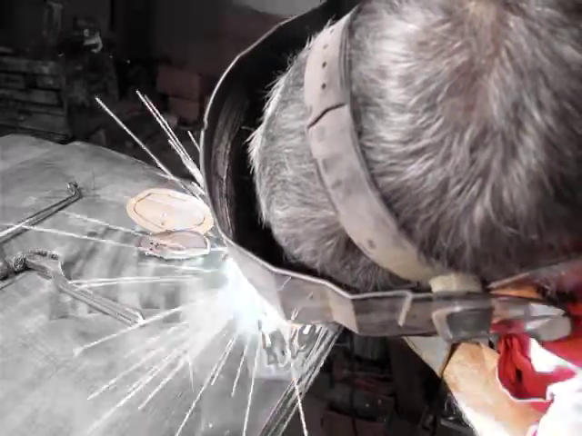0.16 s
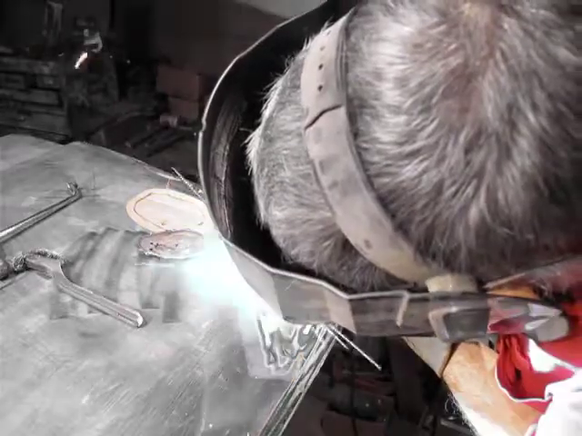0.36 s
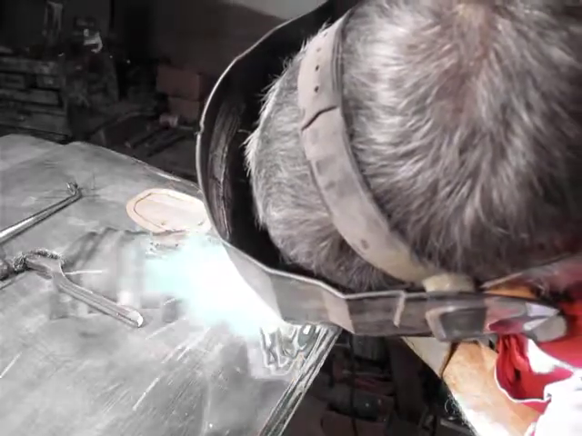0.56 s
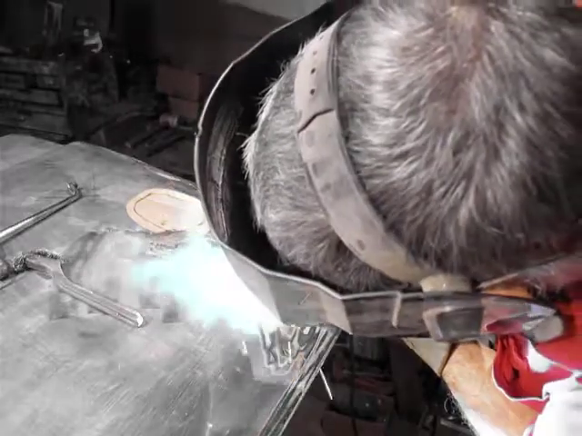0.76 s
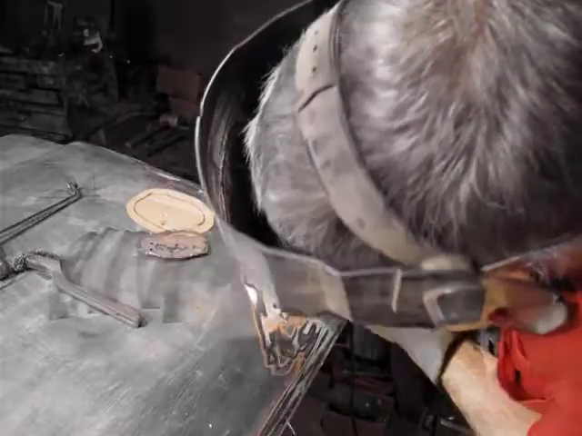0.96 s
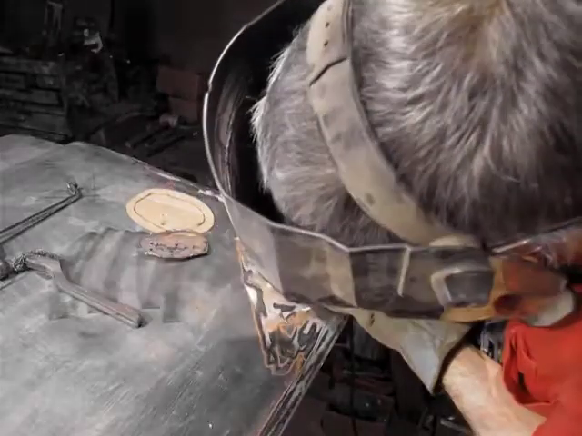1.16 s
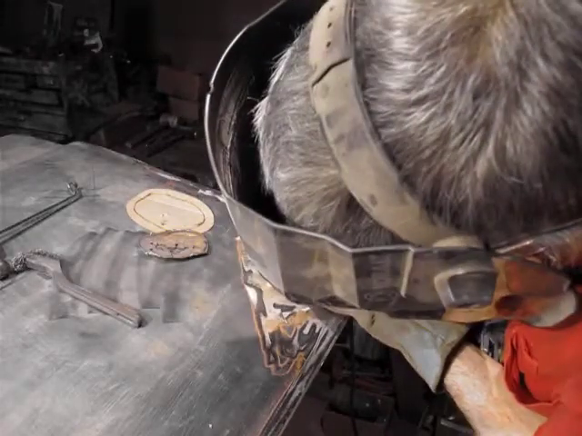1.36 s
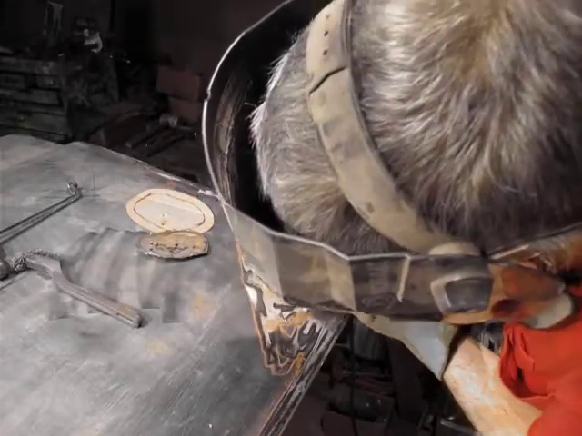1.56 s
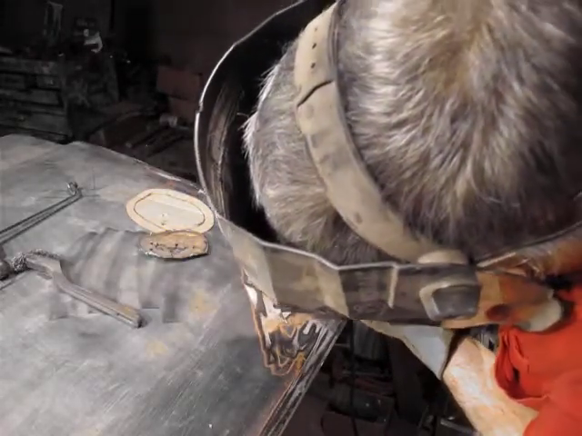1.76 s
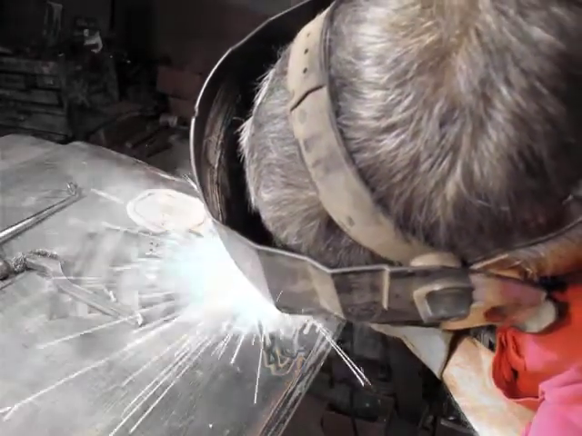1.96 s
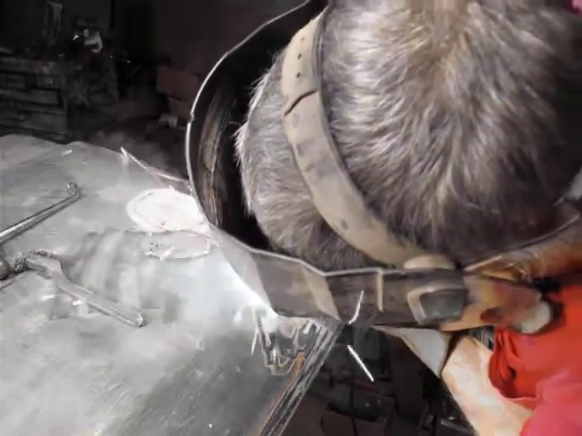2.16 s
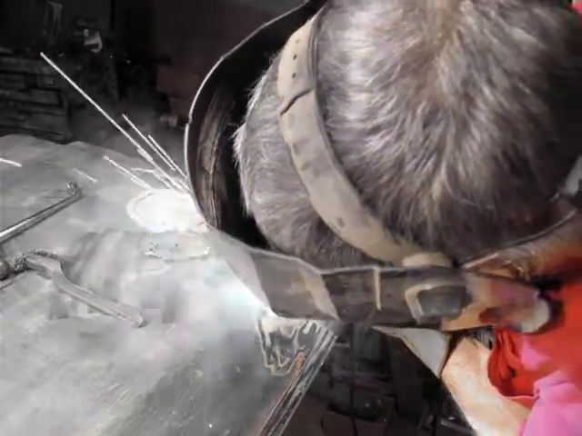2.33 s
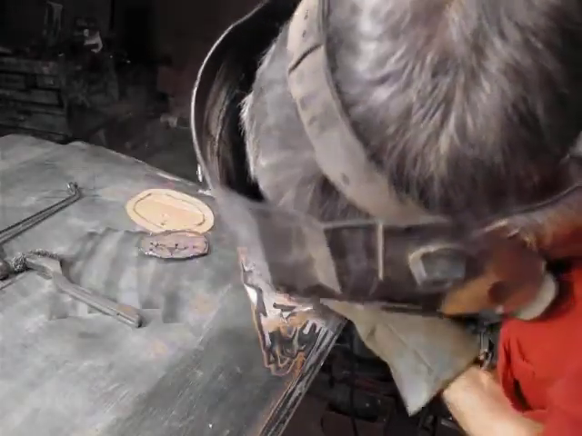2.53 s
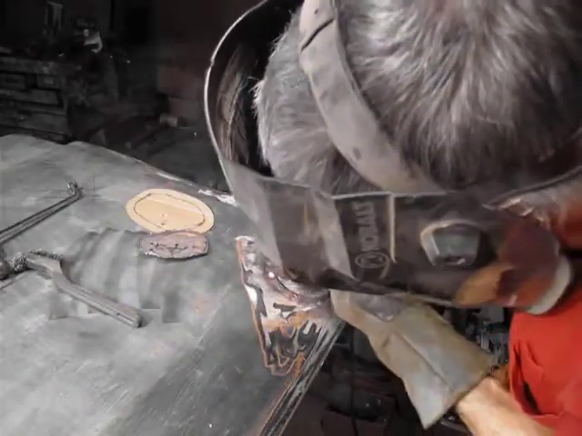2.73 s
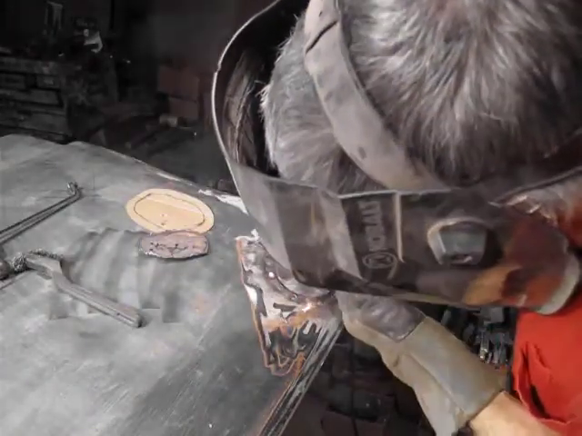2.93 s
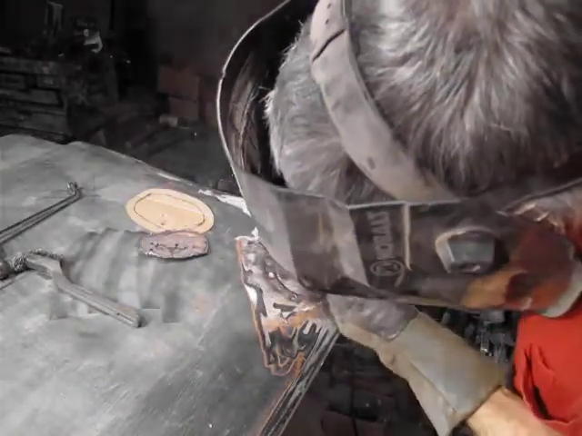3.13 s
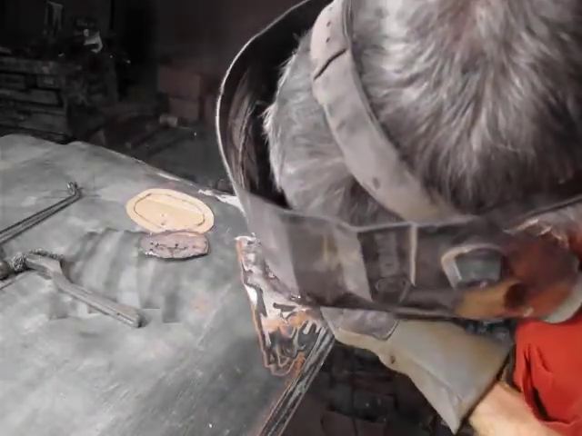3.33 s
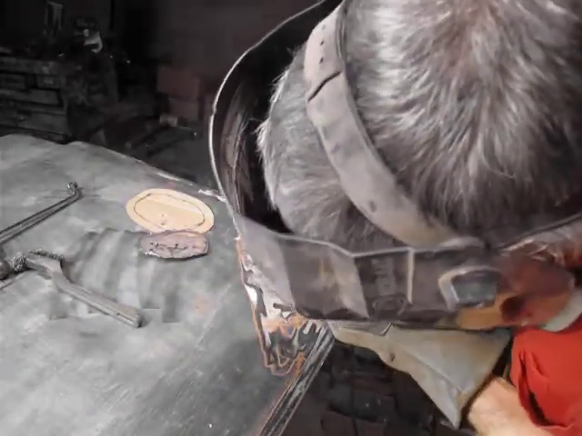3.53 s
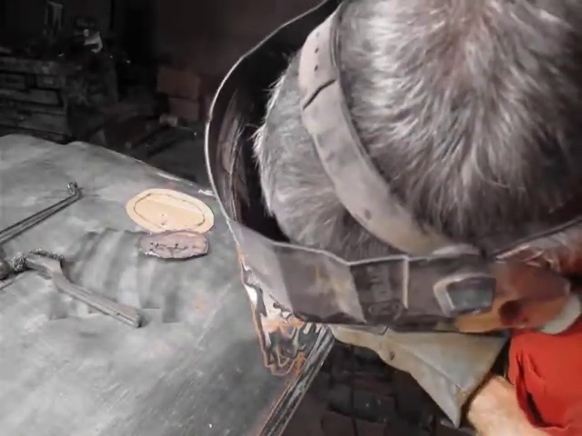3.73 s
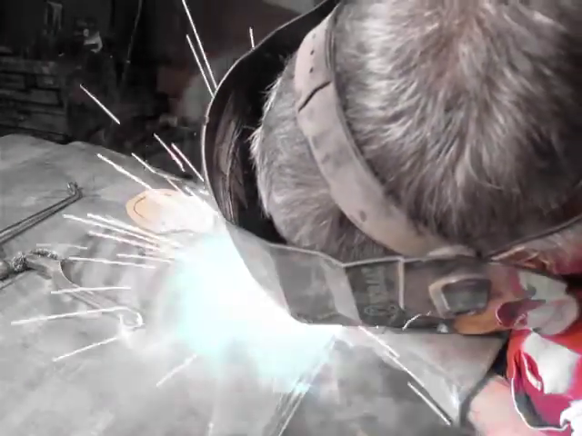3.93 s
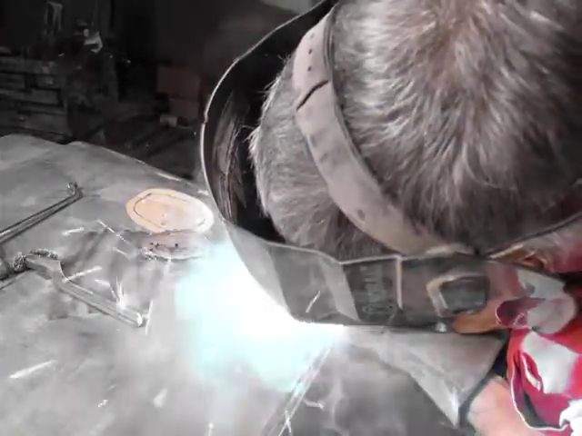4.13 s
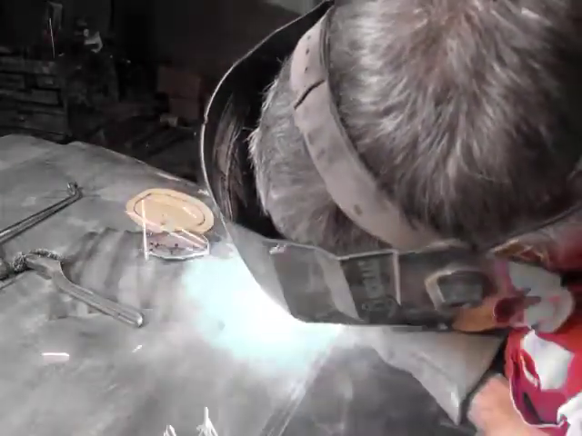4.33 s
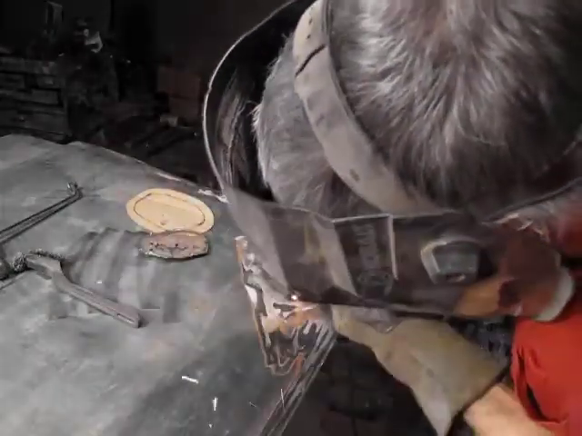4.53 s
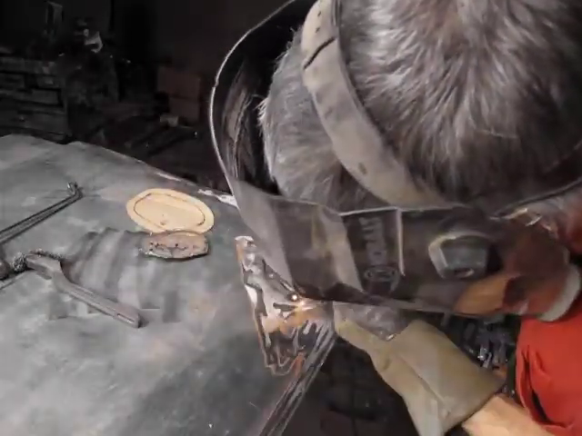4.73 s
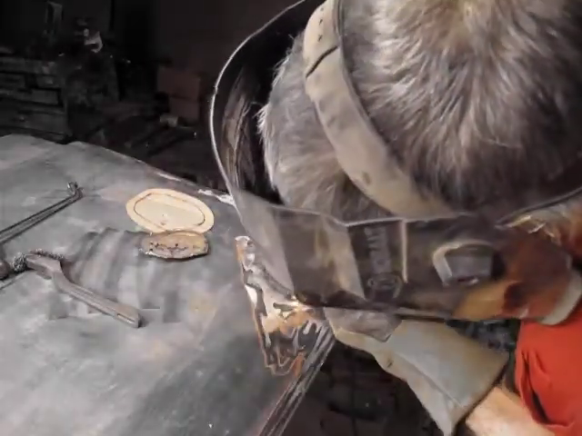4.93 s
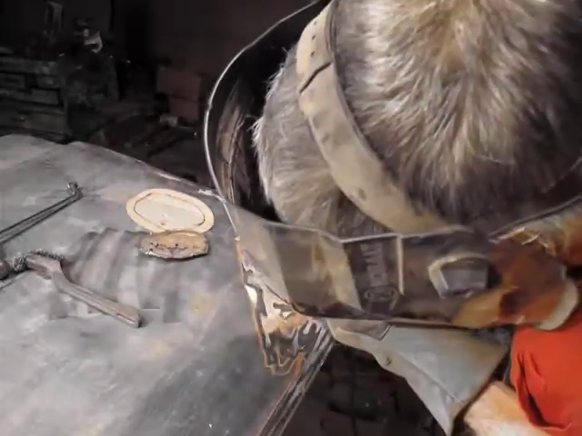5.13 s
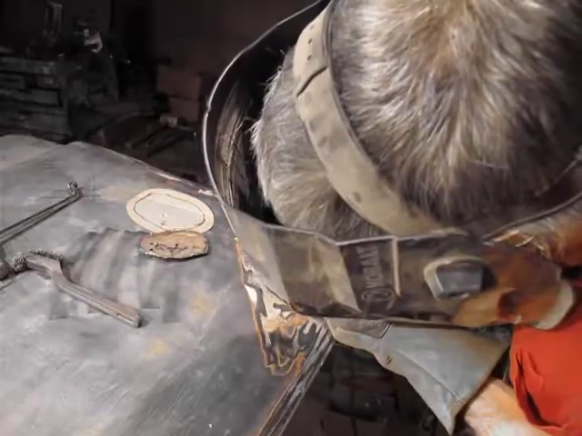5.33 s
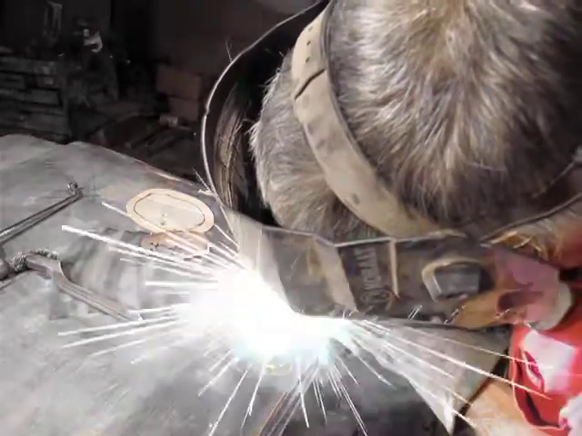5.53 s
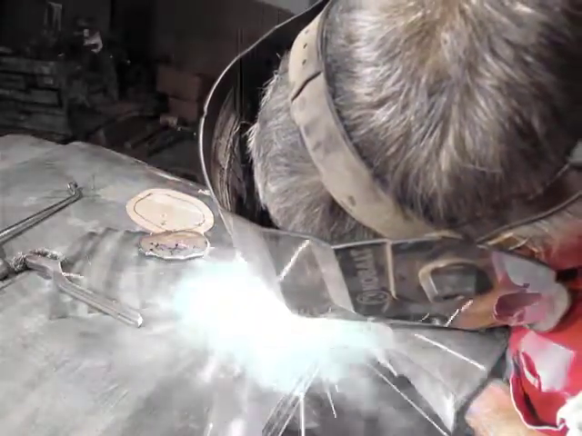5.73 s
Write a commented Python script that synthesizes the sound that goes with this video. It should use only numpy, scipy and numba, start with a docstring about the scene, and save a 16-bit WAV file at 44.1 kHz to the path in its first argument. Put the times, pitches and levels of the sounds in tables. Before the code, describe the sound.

Four short bursts of welding crackle, pop and sizzle on thin sheet steel, over the steady low hum of a workshop fan.

```python
"""Four MIG tack welds on thin rusty sheet steel, a step from a small camera. Two cooling fans hum throughout.
At each trigger pull a valve ticks, shielding gas puffs out and wire rasps through the torch. The wire strikes
with a bang, then shorts and bursts in a run of pops while the arc fizzes. Near surfaces and the workshop echo
every pop, the sheet rings and the camera's gain control ducks the hum. Then the arc dies, the gas bleeds away
and the hum is heard alone."""
import sys
import numpy as np
from scipy import signal
from scipy.fft import rfft, irfft
from scipy.io import wavfile
from scipy.ndimage import uniform_filter1d
from numba import njit

SR = 44100
rng = np.random.default_rng(int(sys.argv[2]) if len(sys.argv) > 2 else 0)


def dump_mix(stems):
    """Bounce the given channels to the path in sys.argv[1] as a 16-bit WAV at rate SR."""
    frames = np.atleast_2d(stems).T  # one column per channel
    limited = np.clip(frames, -1, 1)  # hard clip at full scale
    pcm = np.round(limited * 32767).astype(np.int16)
    wavfile.write(sys.argv[1], SR, pcm)


N = 259308
T = np.arange(N) / SR

# Levels are relative: each source adds its own gain, and spectra give only a shape. blade tones of two fans:
# f/Hz, level/dB
BLADE_TONES = [(212.9, -36), (195.8, -50.5), (642, -50.5)]
# resonances of the fan housing: f/Hz, bandwidth/Hz, level/dB
HOUSING_MODES = [(117, 2.6, -67), (206, 57, -51.5), (356.5, 2.8, -58), (441.6, 20, -55.5), (530, 50, -56),
                 (630.4, 6.8, -55.5), (736, 19, -57), (815, 31, -51), (989, 39, -56.5), (1055, 25, -51.5),
                 (1138, 35, -60.5), (1200, 16, -54), (1834, 31, -60), (2794, 140, -61.5)]
# spectra of the fan's air, the valve tick, the gas spurt and the steady jet: f/Hz, level/dB
AIR_SPECTRUM = [(25, -1), (90, -9), (150, -3), (230, 8), (280, 0.5), (420, 6), (700, 3), (1200, 6.5),
                (1700, 2.5), (2200, -3), (2900, -4.5), (3800, -8.5), (7000, -10), (10000, -10.5),
                (12500, -26), (16000, -30)]
VALVE_SPECTRUM = [(200, -25), (3000, -9), (6000, -10), (9000, 0), (11000, 0), (15500, -4)]
SPURT_SPECTRUM = [(200, -42), (1400, -69), (2700, -21), (4000, -17), (6000, -26), (7200, -5), (7800, -17),
                  (9000, 0), (10500, 6), (11400, -10), (12400, 0), (15500, -19.5)]
JET_SPECTRUM = [(200, -7.5), (1400, -1.5), (2300, -5), (3600, -5), (5500, -7.5), (7000, 0.5), (7800, -3.5),
                (9000, 5.5), (10200, 4), (11200, -15), (12600, -29), (15500, -29)]
# gas flow at each trigger pull: on t/s, off t/s, level/dB
GAS_FLOWS = [(0.11, 0.835, -28.5), (1.8192, 2.385, -30.5), (3.787, 4.39, -28), (5.4547, 6.002, -28.5)]
# reflections from near surfaces: delay t/s, level/dB
ECHO_PATHS = [(.00475, -2.5), (.0138, -13), (.0151, -16)]
# modes of the thin sheet: f/Hz, level/dB, 60 dB decay t/s
SHEET_MODES = [(1055, -73, .4), (1300, -71, .3), (2030, -75, .3)]
# the arc burns: start t/s, end t/s, fizz level/dB
ARC_BURNS = [(.135, .2, -27), (.28, .335, -22), (.335, .53, -10.5), (.53, .765, -11.5), (1.935, 2.07, -10),
             (2.07, 2.3, -6.5), (3.90, 4.12, -11), (4.12, 4.25, -12.5), (4.29, 4.33, -21),
             (5.515, 5.56, -16), (5.56, 5.64, -23), (5.64, 5.95, -12)]
# runs of light dips of wire into the pool: first t/s, last t/s, rate/Hz, timing spread/cycles, level/dB
WIRE_DIPS = [(.145, .25, 300, .3, -25), (.484, .521, 55, .1, -1), (1.9576, 2.075, 120, .18, 0),
             (2.081, 2.179, 145, .16, 1.5), (2.2059, 2.2937, 115, .15, 1), (5.535, 5.635, 300, .3, -24)]
# a large drop bursts and throws spatter: t/s, level/dB
DROP_BURSTS = [(.335, -4), (.354, 1), (.361, 6), (.3761, 3), (.3968, 10), (.414, 12), (.4395, 10),
               (.4578, 10), (.4717, 8), (.4792, 4), (.513, 10), (.5561, 4), (.5713, 10), (.5878, 9),
               (.6041, 3), (.6212, 12), (.6382, 6), (.6563, 7), (.6915, 3), (.7099, 1), (.7222, 5),
               (.7371, 7), (.7507, 9), (1.8738, -13), (1.9495, 5), (1.9717, 4), (2.0096, 4), (2.0222, 5),
               (2.088, 5), (2.1905, 7), (2.2161, 10), (2.252, 7), (2.2716, 8), (2.2874, 10), (3.9082, 0),
               (3.922, 11), (3.9386, 4), (3.9546, 8), (3.9814, 4), (3.9895, 9.5), (4.0063, 4), (4.0186, 6),
               (4.0316, 9), (4.0456, 2), (4.0606, 8), (4.0745, 8), (4.0897, 12), (4.1055, 7.5), (4.1215, 7),
               (4.1434, 7), (4.1597, 6), (4.1769, 9), (4.1943, 7), (4.2109, 6), (4.2286, 11), (5.5771, -5),
               (5.6411, -4), (5.673, 7), (5.6869, 5), (5.7017, -1), (5.7178, 3), (5.7309, 2), (5.7361, 12),
               (5.7541, 6), (5.7723, 11), (5.7916, 3), (5.8106, 4), (5.8334, 9), (5.8525, 10)]
# the wire strikes and blows apart: t/s, level/dB, decay t/s, thump level/dB, thump upper f/Hz
WIRE_STRIKES = [(0.1312, -6, .0005, -8, 120), (0.2700, -2, .001, -10, 170), (0.3383, 10, .001, -4, 130),
                (1.8808, 3, .0005, -11, 280), (1.9322, 7, .0004, -9, 260), (3.8615, 8, .0012, -4, 550),
                (4.2872, 3, .0005, -11, 350), (5.5092, 10, .0012, -5, 1100), (5.6575, 9, .0008, -8, 750)]
# spectra of the echoes, the fizz, the pops and the bangs: f/Hz, level/dB
ECHO_SPECTRUM = [(60, -20), (1000, -14), (1900, -9), (2400, -13), (3000, -5), (3700, -7), (5000, -2),
                 (6800, -6), (7800, -7), (8500, 2), (10400, 6.5), (11300, 1), (12400, -7), (14400, -3),
                 (15500, -11)]
FIZZ_SPECTRUM = [(100, -30), (400, -23), (1200, -13), (2000, -10.5), (3300, -13), (4300, -11.5),
                 (5000, -6.5), (6100, -5.5), (6900, -2.5), (7850, -11), (8800, 0), (9500, 3.5), (10500, 4),
                 (11200, -2), (12600, -12.5), (15500, -19)]
POP_SPECTRUM = [(60, -30), (200, -18), (500, -12), (1500, -10.5), (2000, -6.5), (3100, -7), (4300, -12.5),
                (5200, -10), (6400, -5), (6950, 1.5), (7750, -11), (9200, 0), (10400, 2), (11300, -6),
                (12600, -9), (13300, -16), (15500, -17)]
BANG_SPECTRUM = [(60, -26), (200, -18), (500, -13), (1250, -8.5), (2100, -11), (3300, -8), (4200, -11),
                 (6000, -5), (6900, 2.5), (7800, -9), (9000, -2), (10300, 2.5), (11300, -5), (12600, -10),
                 (15500, -20)]


def undb(db):
    """Amplitude ratio of a level: tenfold for every 20 dB."""
    return 10 ** (np.asarray(db) / 20)


def unit(x):
    """Normalisation to an rms of 1."""
    return x / np.sqrt(np.mean(x ** 2))


def ring(x, response):
    """Convolution: the output of a linear system with this impulse response."""
    return signal.fftconvolve(x, response)[:N]


def colour(spectrum, size=4096):
    """Minimum-phase response of unit energy, found by folding the cepstrum of a spectral outline."""
    hz, db = np.transpose(spectrum)
    f = np.maximum(np.fft.rfftfreq(size, 1 / SR), 1)
    magnitude = undb(np.interp(np.log(f), np.log(hz), db))
    cepstrum = irfft(np.log(magnitude))
    cepstrum[1:size // 2] *= 2
    cepstrum[size // 2 + 1:] = 0
    response = irfft(np.exp(rfft(cepstrum)))
    return response / np.linalg.norm(response)


def hiss(spectrum):
    """White noise filtered to a spectral outline, rms 1."""
    return unit(ring(rng.standard_normal(N), colour(spectrum)))


def resonance(hz, width_hz):
    """Noise under a Lorentzian resonance curve, rms 1."""
    f = np.fft.rfftfreq(N, 1 / SR)
    return unit(irfft(rfft(rng.standard_normal(N)) / (1 + ((f - hz) / width_hz * 2) ** 2), N))


def wander(rate_hz):
    """Random modulation: steps smoothed by two moving averages, rms 1."""
    span = int(SR / rate_hz)
    steps = np.repeat(rng.standard_normal(N // span + 1), span)
    return unit(uniform_filter1d(uniform_filter1d(steps, span), span)[:N])


def gate(on, off, rise_s, fall_s):
    """First-order envelope: exponential rise from on, exponential decay from off."""
    return (1 - np.exp(-np.maximum(T - on, 0) / rise_s)) * np.exp(-np.maximum(T - off, 0) / fall_s)


def add(track, s, sound):
    """Superposition of a sound on a track at time s."""
    start = int(s * SR)
    track[start:start + len(sound)] += sound[:max(N - start, 0)]


def burst(decay_s, spray, size=512):
    """Pressure impulse of unit energy; interference with a short random tail tints each one anew."""
    pulse = rng.standard_normal(size) * np.exp(-np.arange(size) / SR / decay_s)
    pulse *= spray / np.linalg.norm(pulse)
    pulse[0] = 1
    spectrum = rfft(pulse, 4 * size)
    tinted = irfft(spectrum / np.sqrt(np.abs(spectrum)))[:size]  # halves the ripple in dB
    return tinted / np.linalg.norm(tinted)


def fan(wobble=0.00299, throb_db=0.86, air_db=-41.5):
    """Blade tones of two fans beat, over housing resonances and the broadband noise of rushing air."""
    phase_per_hz = 2 * np.pi * np.cumsum(1 + wobble * wander(9.9)) / SR
    blades = sum(np.sqrt(2) * np.sin(hz * phase_per_hz) * undb(db + throb_db * wander(35))
                 for hz, db in BLADE_TONES)
    housing = sum(undb(db) * resonance(hz, width_hz) for hz, width_hz, db in HOUSING_MODES)
    return blades + housing + undb(air_db) * hiss(AIR_SPECTRUM)


def wire_feed(rasp_db=-40, chatter_db=2, afterflow_s=0.1):
    """Friction noise of wire sliding through the torch; it stops a little before the gas."""
    running = sum(gate(on, off - afterflow_s, .002, .02) for on, off, _ in GAS_FLOWS)
    return running * undb(rasp_db + chatter_db * wander(170)) * resonance(hz=2400, width_hz=1100)


def gas(tick_db=31.5, spurt_db=8.5, sag_db=-9, sag_after_s=.135, sag_width_s=.035, flutter_db=0):
    """Jet noise: the valve ticks, stored pressure escapes, and flow sags until the regulator responds."""
    ticks, spurt, flow = np.zeros((3, N))
    for on, off, db in GAS_FLOWS:
        add(ticks, on, undb(db + tick_db) * burst(decay_s=.0012, spray=.72))
        spurt += undb(db + spurt_db) * gate(on, on, rise_s=.002, fall_s=.028)
        sag = sag_db * np.exp(-((T - on - sag_after_s) / sag_width_s) ** 2)
        flow += undb(db + sag) * gate(on, off, rise_s=.12, fall_s=.035)
    flutter = undb(flutter_db * wander(65))  # at 0 dB the jet is smooth
    jet = flutter * (spurt * hiss(SPURT_SPECTRUM) + flow * hiss(JET_SPECTRUM))
    return jet + ring(ticks, colour(VALVE_SPECTRUM))


def workshop(near, radiated, t60_s=.19, build_s=.0069, tail_db=3, size=32768):
    """Reverberation: a diffuse field builds up behind the near sound and decays exponentially."""
    t = np.arange(size) / SR
    tail = rng.standard_normal(size) * (1 - np.exp(-t / build_s)) * np.exp(-np.log(1000) * t / t60_s)
    return near + undb(tail_db) * ring(radiated, tail / np.linalg.norm(tail))


def reflections(blasts, jitter_s=.00004):
    """Early reflections of each blast (t/s, level/dB); they vary, as no two blasts fly apart alike."""
    echoes = np.zeros(N)
    for s, db in blasts:
        for delay_s, echo_db in ECHO_PATHS:
            arrival = s + delay_s + jitter_s * rng.standard_normal()
            add(echoes, arrival, undb(db + echo_db) * burst(decay_s=.0007, spray=.8))
    return ring(echoes, colour(ECHO_SPECTRUM))


def sheet(impulses, sing_from_s=4.12, sing_to_s=4.27, sing_db=-36.5, size=32768):
    """Damped modes of the steel ring at every blast; the lowest sings briefly late in the third tack."""
    t = np.arange(size) / SR
    modes = sum(undb(db) * np.sin(2 * np.pi * hz * t) * np.exp(-np.log(1000) * t / t60_s)
                for hz, db, t60_s in SHEET_MODES)
    singing = undb(sing_db + 2 * wander(40)) * gate(sing_from_s, sing_to_s, .03, .045)
    lowest_mode = np.sqrt(2) * np.sin(2 * np.pi * SHEET_MODES[0][0] * T)
    return ring(impulses, modes) + singing * lowest_mode


def arc_fizz(grain_db=5):
    """Amplitude-modulated noise of the burning arc: fast flutter makes it grainy."""
    burning = sum(undb(db) * gate(on, off, rise_s=.0044, fall_s=.018) for on, off, db in ARC_BURNS)
    return burning * unit(rng.standard_normal(N) * undb(grain_db * wander(1500)))


def thump(top_hz, low_hz=60, size=2048):
    """Air displaced by bursting metal: a low, band-limited pressure pulse."""
    band = signal.butter(1, [low_hz, top_hz], "band", fs=SR)
    return signal.lfilter(*band, signal.unit_impulse(size))


def short_circuits(scatter_db=1.8, refill_s=.006):
    """Quasi-periodic shorts of the wire as (t/s, level/dB); a large drop replaces the dips next to it."""
    dips = []
    for first, last, rate_hz, unevenness, db in WIRE_DIPS:
        chance = rng.standard_normal((64, 2))
        beats = np.linspace(first, last, round((last - first) * rate_hz) + 1)
        dips += [(s + late * unevenness / rate_hz, db + size * scatter_db)
                 for s, (late, size) in zip(beats, chance)]
    clear_dips = [(s, db) for s, db in dips if all(abs(s - drop) > refill_s for drop, _ in DROP_BURSTS)]
    return list(DROP_BURSTS) + clear_dips


def weld(bang_db=24, pop_db=23.5, pop_thump_db=-28, bang_room_db=-5.5, pop_room_db=-5):
    """Exploding bridges of molten wire radiate impulses; returns the near sound and the room's share."""
    bangs, thumps, pops, impulses = np.zeros((4, N))
    shorts = short_circuits()
    blasts = []
    for s, db, decay_s, thump_db, top_hz in WIRE_STRIKES:
        level = db + bang_db
        add(bangs, s, undb(level) * burst(decay_s, spray=1.5))
        add(thumps, s, undb(level + thump_db) * thump(top_hz))
        add(impulses, s, undb([level + bang_room_db]))
        blasts.append((s, level))
    for s, db in shorts:
        level = db + pop_db
        add(pops, s, undb(level) * burst(decay_s=.0005, spray=.55))
        # the thump grows twice as fast in dB as the pop, so only the largest drops thump
        add(thumps, s, undb(level + pop_thump_db + db) * thump(top_hz=300))
        add(impulses, s, undb([level + pop_room_db]))
        blasts.append((s, level))
    echoes = reflections(blasts)
    fizz = arc_fizz()
    bright = colour(FIZZ_SPECTRUM)
    cracks = ring(bangs, colour(BANG_SPECTRUM)) + ring(pops, colour(POP_SPECTRUM))
    near = cracks + thumps + echoes + ring(fizz, bright) + sheet(impulses)
    radiated = ring(impulses + fizz, bright)  # mostly the treble scatters round the room
    return near, radiated


def scene():
    """Superposition of the weld in its room, the gas jet, the wire feed and the fan."""
    return (workshop(*weld()) + gas() + wire_feed() + fan())[None]


@njit
def follow(magnitude, attack, release, hold):
    """Peak detection: the envelope rises fast, holds, then decays exponentially."""
    envelope, peak, wait = np.empty(len(magnitude)), 0., 0.
    for i in range(len(magnitude)):
        if magnitude[i] > peak:
            peak += (magnitude[i] - peak) * attack
            wait = hold
        elif wait > 0:
            wait -= 1
        else:
            peak *= 1 - release
        envelope[i] = peak
    return envelope


def gain_control(x, threshold_db=-21, slope=.87, attack_s=.0055, hold_s=.014, release_s=.027):
    """Compression: the gain falls by a share (slope) of the envelope's excess in dB over the threshold."""
    peak = follow(np.abs(x), 1 / (attack_s * SR), 1 / (release_s * SR), hold_s * SR)
    return x * np.maximum(peak / undb(threshold_db), 1) ** -slope


def record(dry, notch_hz=11800, notch_width_hz=1100, ceiling=.5, low_hz=83, top_hz=15650):
    """The camera: antiresonance of the microphone port, compression, soft saturation and band limiting."""
    x = signal.lfilter(*signal.iirnotch(notch_hz, notch_hz / notch_width_hz, fs=SR), dry[0])
    x = ceiling * np.tanh(gain_control(x) / ceiling)
    x = signal.lfilter(*signal.butter(1, low_hz, "high", fs=SR), x)
    top_cut = signal.ellip(10, .2, 80, top_hz, fs=SR, output="sos")
    return signal.sosfilt(top_cut, x)[None]


dry = scene()
out = record(dry)
dump_mix(out)
```